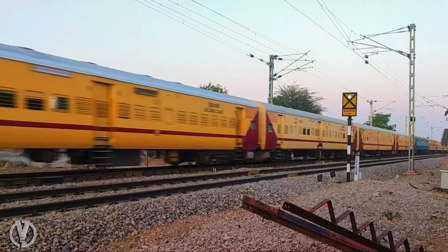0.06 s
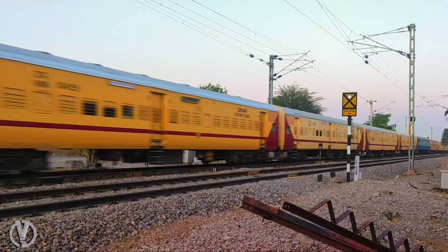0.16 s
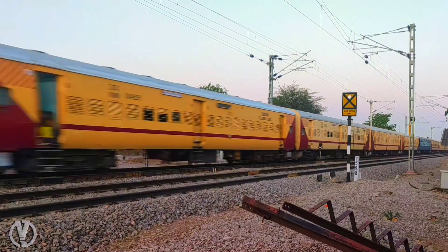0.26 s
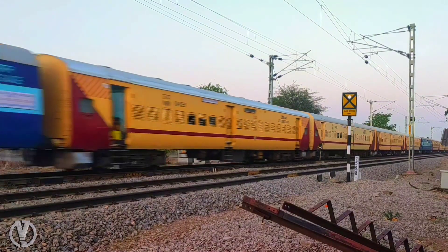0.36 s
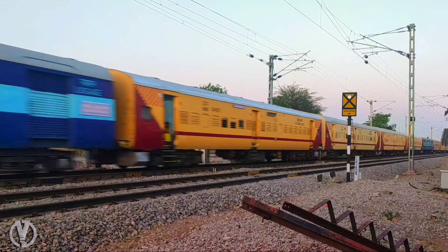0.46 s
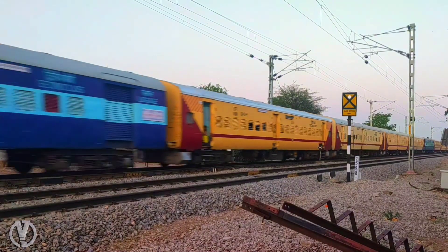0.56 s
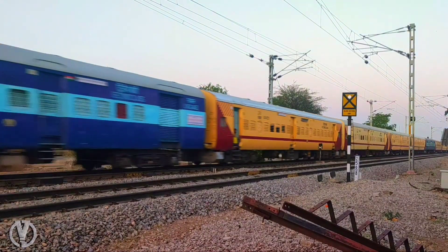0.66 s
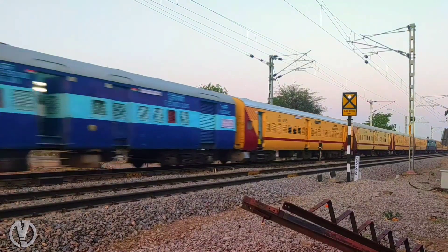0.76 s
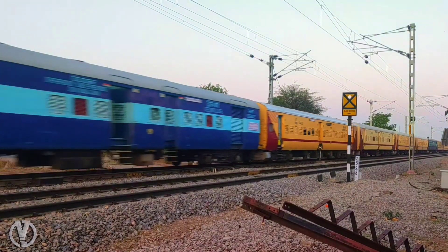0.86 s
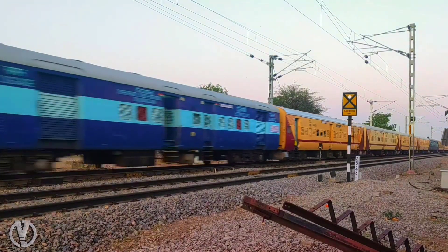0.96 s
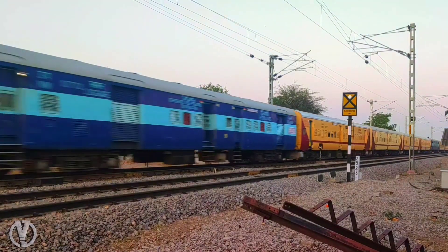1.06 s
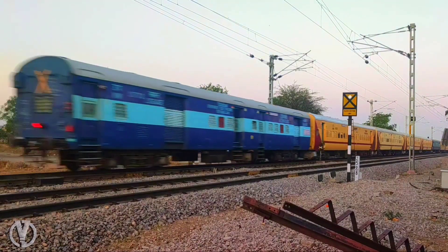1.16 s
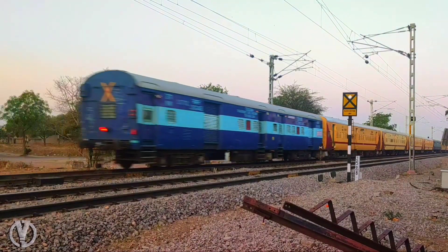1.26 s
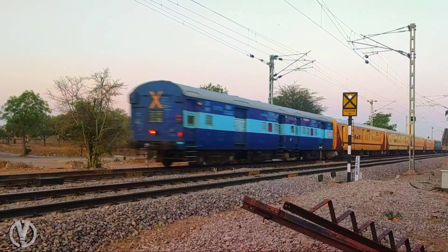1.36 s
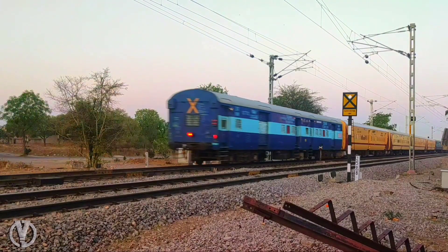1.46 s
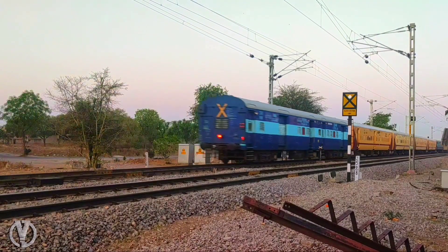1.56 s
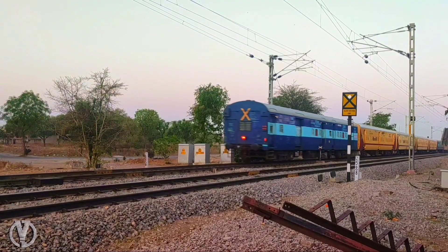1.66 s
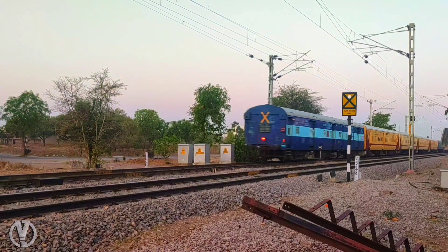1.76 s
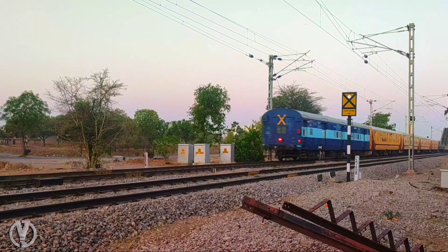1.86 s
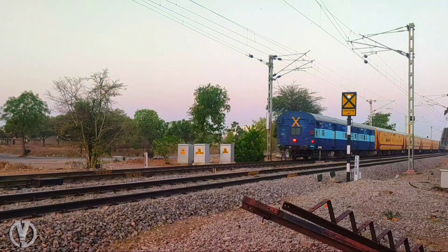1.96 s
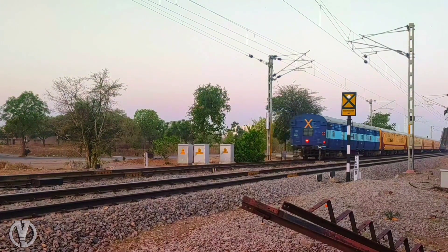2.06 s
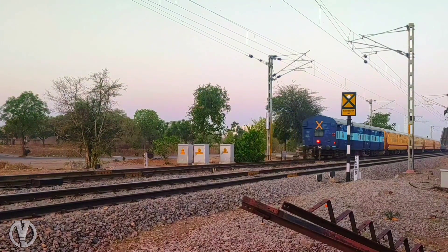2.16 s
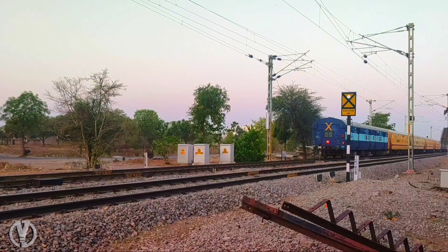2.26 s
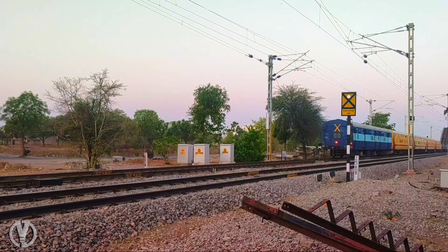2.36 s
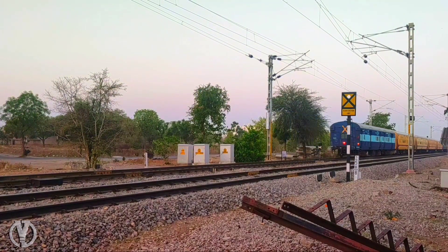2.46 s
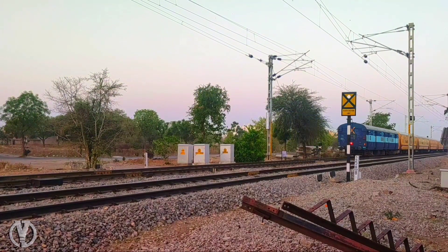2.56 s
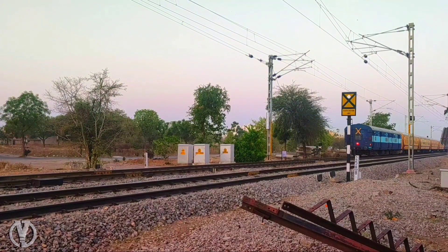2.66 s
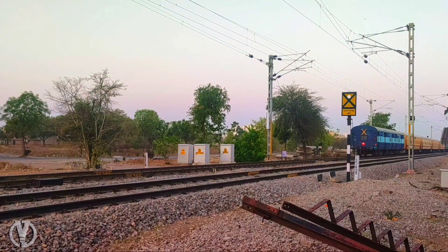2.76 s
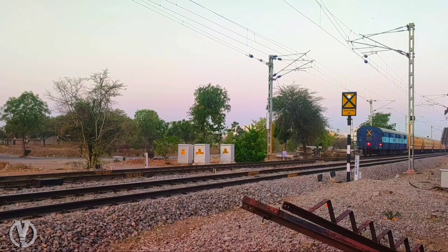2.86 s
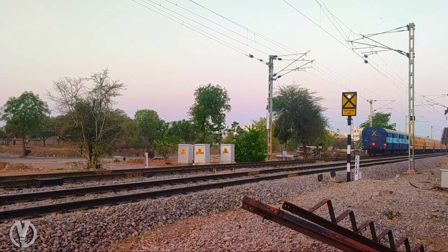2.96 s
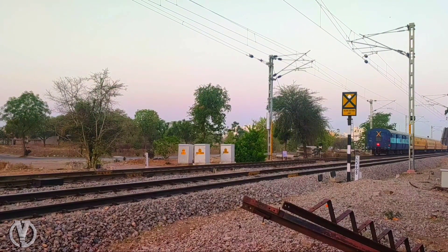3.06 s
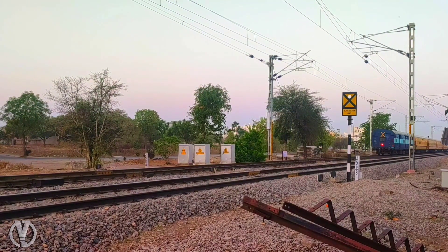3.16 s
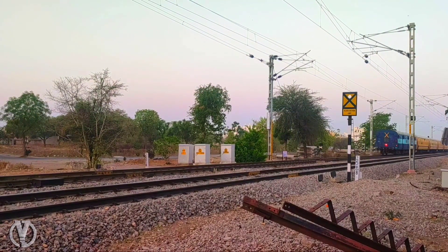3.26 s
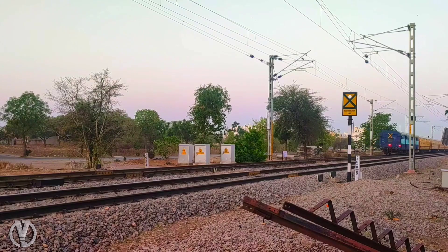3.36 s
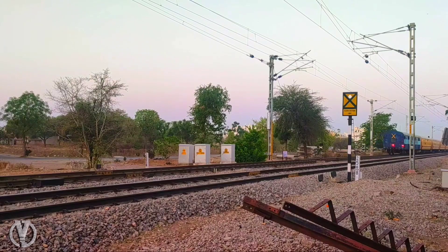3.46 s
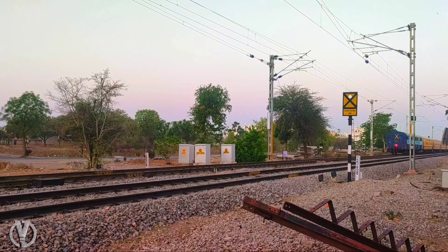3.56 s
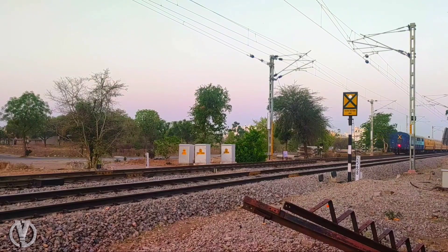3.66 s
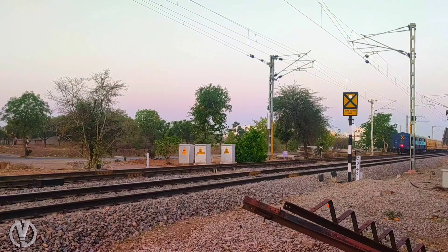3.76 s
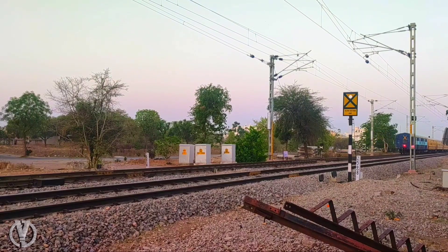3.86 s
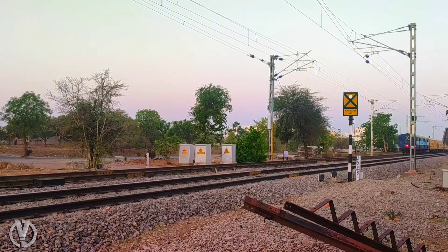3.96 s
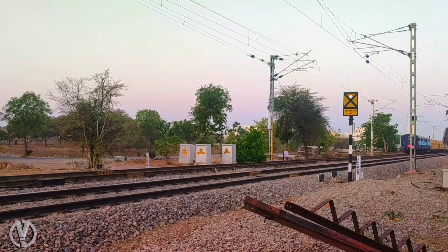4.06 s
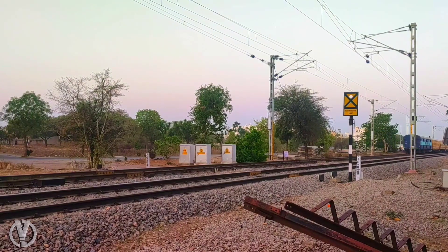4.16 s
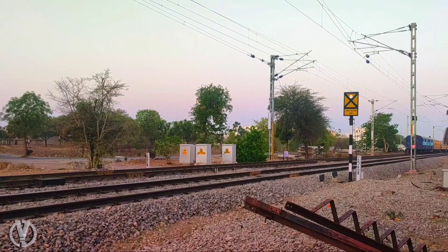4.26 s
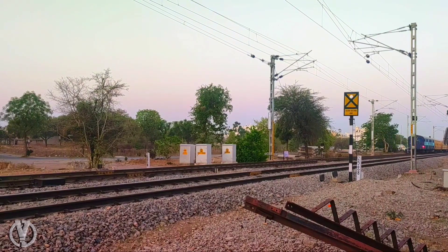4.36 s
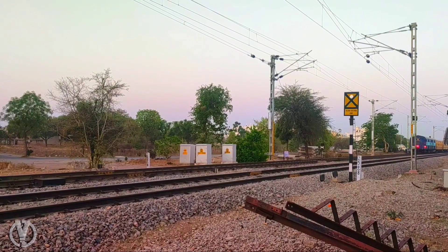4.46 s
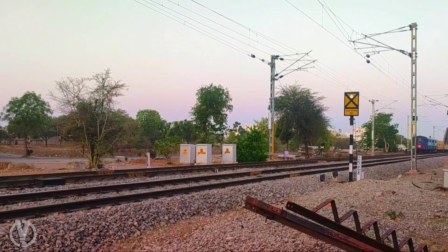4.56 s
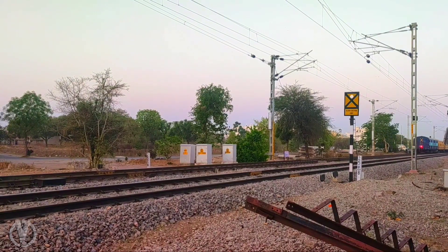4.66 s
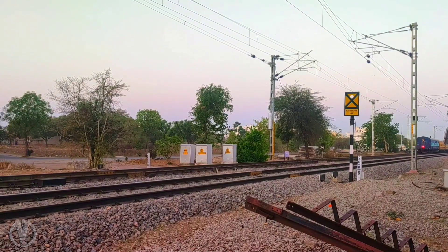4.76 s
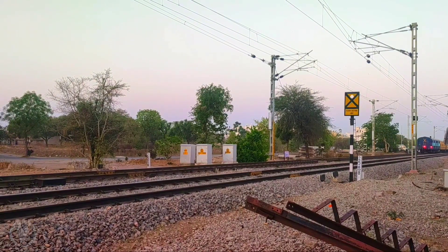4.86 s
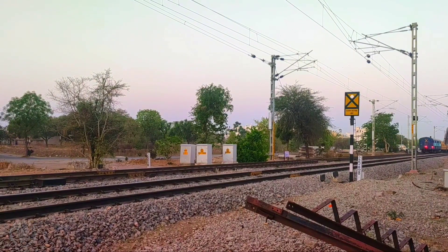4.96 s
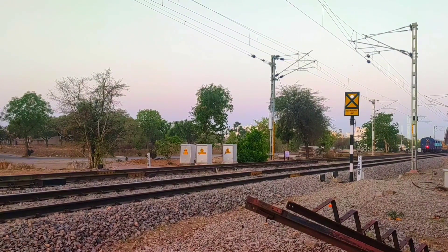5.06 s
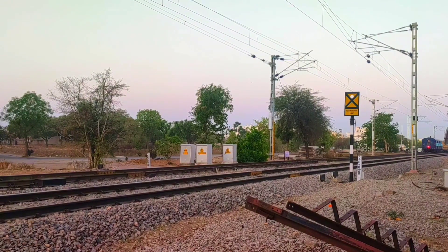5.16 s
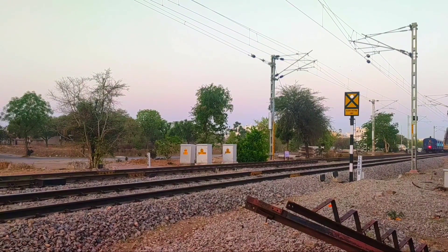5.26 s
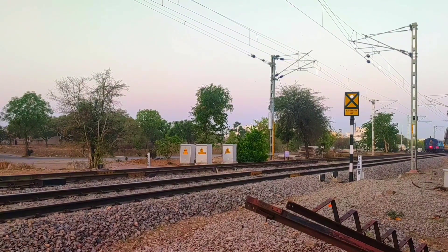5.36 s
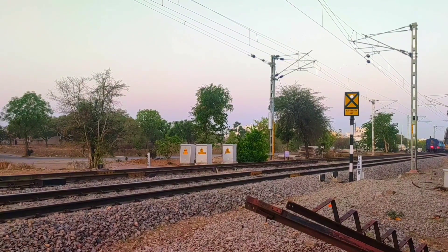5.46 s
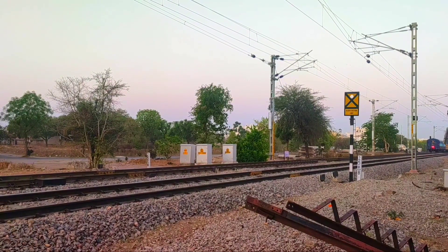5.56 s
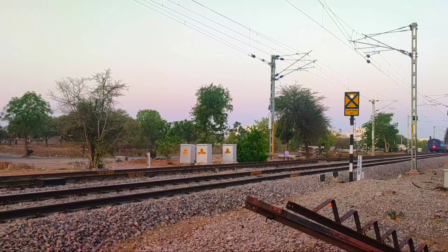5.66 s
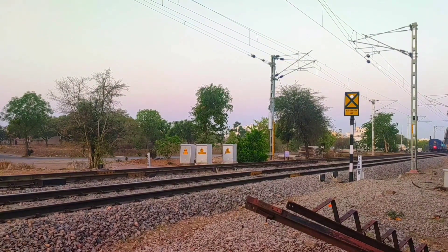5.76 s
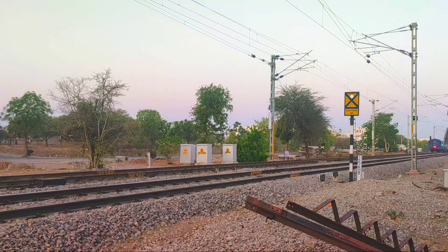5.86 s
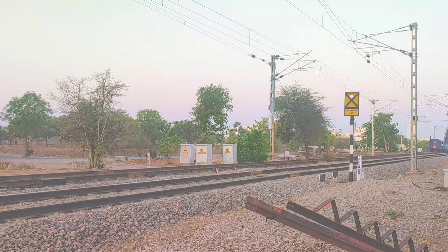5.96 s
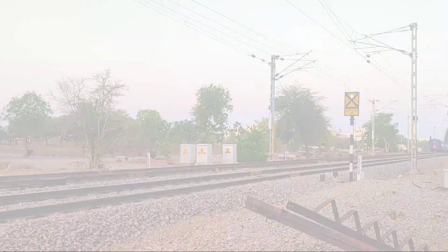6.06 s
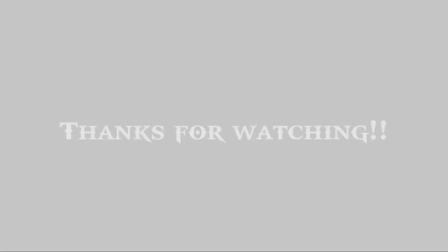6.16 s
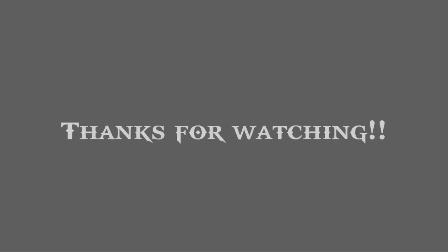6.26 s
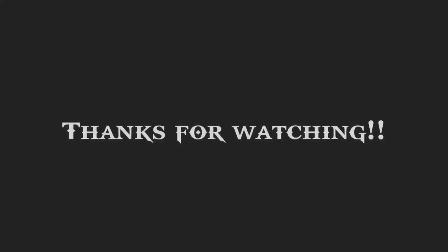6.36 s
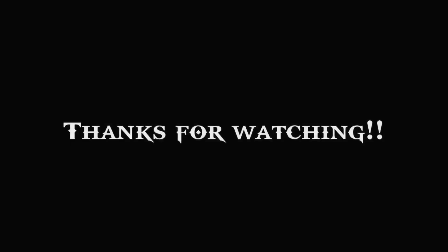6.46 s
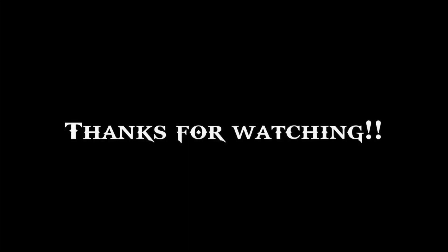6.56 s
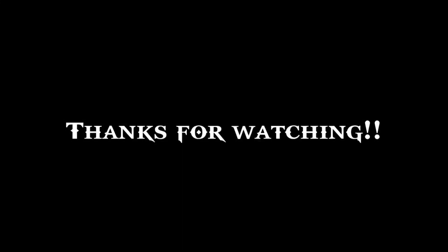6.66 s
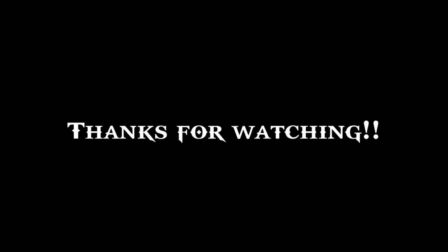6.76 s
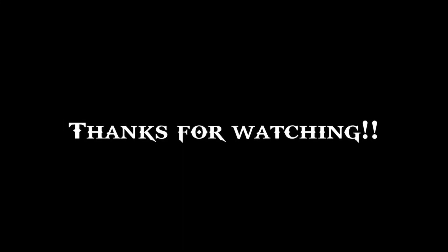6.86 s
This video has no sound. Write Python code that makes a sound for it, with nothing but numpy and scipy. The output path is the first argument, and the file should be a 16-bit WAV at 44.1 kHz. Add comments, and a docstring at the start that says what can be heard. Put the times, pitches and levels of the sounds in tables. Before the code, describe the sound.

Loud rushing train coaches with metallic clanks and brief wheel squeals pass a trackside listener, then shrink to distant rolling noise with faint bird chips.

```python
"""Beside a railway line, the last coaches of an express rush past and roll away into the distance.
Rough wheels shake noise and resonances out of wheel and rail; axles strike rail joints as shaped noise bursts
and ring the bogies; loose metal pings as short decaying sines, and a flange squeals in wavering tones.
Low filtered noise gives the rumble of ground and slipstream; a faint steady high hiss lies underneath;
a bird chips faintly in short rising tones, until the sound is faded out."""
import sys
import numpy as np
from scipy import signal
from scipy.fft import rfft, irfft, next_fast_len
from scipy.io import wavfile
from scipy.ndimage import uniform_filter1d

SR = 44100
rng = np.random.default_rng(int(sys.argv[2]) if len(sys.argv) > 2 else 0)


def store_wav(level_fs):
    """Save 16-bit WAV to argv[1]."""
    pcm = np.round(np.clip(np.atleast_2d(level_fs), -1, 1) * 32767)
    wavfile.write(sys.argv[1], SR, pcm.T.astype(np.int16))


def volts(x):
    """Linear amplitude factor 10**(x/20) for a level x in dB, scalar or array-like."""
    e = np.asarray(x, float) / 20
    return 10 ** e


N = 304277
SIZE = next_fast_len(N)
T = np.arange(N) / SR
HZ = np.maximum(np.arange(SIZE // 2 + 1) * SR / SIZE, 1)

# Spectral shape of rolling noise beside and ahead, before its bass roll-off: frequency_hz, density_db
NEAR_COLOUR = [(120, 5), (200, -10.5), (330, -2.5), (500, -3.5), (900, -2.5), (1350, -2.5), (1900, -2.5),
               (2250, -6), (2900, -11), (4200, -15), (6000, -20), (10000, -23), (13000, -32), (16000, -40)]
AWAY_COLOUR = [(130, -2), (200, -9), (300, -9.5), (420, -10.5), (660, -6.5), (868, -6.5), (1060, -7),
               (1300, -7), (1650, -2.5), (2140, -6.5), (2760, -14.5), (4160, -12), (5920, -16.5),
               (9840, -19), (11300, -23.5), (14000, -47.5)]
# Resonances of wheels and rails: frequency_hz, width_hz, nominal_rise_over_noise_db
NEAR_MODES = [(291.2, 56, 7.5), (640, 50, 8), (954, 60, 8.5), (2034, 73, 6), (2490, 74, 8.5),
              (3344, 310, 6), (3800, 89, 6.5)]
AWAY_MODES = [(672, 270, 3.96), (1026, 105, 9), (2110, 89, 6), (2370, 37, 3.8), (3473, 61, 5.9),
              (3754, 90, 5.7), (4160, 26, 7.4), (5100, 83, 1), (5680, 29, 1.3)]
# Shared part of the noise at two microphone ports: frequency_hz, share_0_to_1
NEAR_LIKE = [(100, 1), (400, 0.6), (1300, 0.87), (2400, 0.5), (4000, 0.07), (9000, 0)]
AWAY_LIKE = [(100, .98), (300, 0.97), (630, 0.8), (1400, 0.18), (3000, 0.44), (6700, 0.051)]
# Level difference of the ports, train beside and ahead: frequency_hz, left_minus_right_db
NEAR_BALANCE = [(60, 0.5), (500, 1), (1300, 2.5), (2300, 2.5), (4300, 1.5), (8000, 2), (13000, -1)]
AWAY_BALANCE = [(100, .5), (400, 0), (1050, -0.5), (1300, -5.5), (1650, -3), (2350, 4.5), (4340, -2.5),
                (8000, 5), (14000, -10)]
# Roar of the rolling train: time_s, level_db
ROLL = [(0, -12), (.2, -13), (.8, -11), (.97, -13.5), (1.15, -15.5), (1.4, -16), (1.7, -20.5), (2.1, -20.5),
        (2.3, -20), (2.7, -22), (3.1, -21), (3.5, -22), (4.9, -22.5), (5.3, -22.5), (5.9, -25.5)]
# Low mids of the rolling noise against its roar: time_s, relative_db
BOOM = [(0, 0), (.9, -4), (1.15, -4.5), (1.4, -4), (1.8, -8), (2.6, -10), (3.1, -15.5), (4.3, -12),
        (5.6, -4.5), (5.9, -7.5)]
# Spectral shape of the rumble, before its treble roll-off: frequency_hz, density_db
RUMBLE_COLOUR = [(8.8, -53), (15, 0), (54, 3), (84, -5), (114, -14.5), (200, -18), (260, -58), (440, -120)]
# Ground and slipstream: time_s, level_db
RUMBLE_LEVEL = [(0, -15.5), (.9, -16.5), (1.0, -21), (2.2, -20.5), (2.46, -16), (2.8, -22.5), (3.3, -18.5),
                (5.6, -18.5), (6.1, -22)]
# Rail joints: last_axle_s, clank_db, thump_db, hiss_db, smear_ratio (how much longer than a near blow)
JOINTS = [(.819, -11, -23, -20.5, 1.05), (1.433, -20, -12, -24.5, 1.2), (2.468, -18, -27, -22.5, 1.6)]
# Extra force of each axle of the last two coaches, front to back: blow_db
AXLE_DB = [-0.5, -0.5, -3, -1.5, -2, 0.7, 1, 1.8]
# Knocks outside the axle rhythm: time_s, clank_db, thump_db, hiss_db
KNOCKS = [(0.358, -11, -25, -21.5), (1.227, -12, -14.5, -40.5), (2.177, -25.5, -43, -30.5),
          (2.295, -41, -40, -28.5), (2.413, -20.5, -28.5, -25.5)]
# Resonances of a struck bogie frame: frequency_hz, relative_db, t60_s
BOGIE_MODES = [(283, 4.5, .12), (396, 1.5, 0.1), (547, -3.5, 0.042)]
# Brief tones, mostly a singing wheel or flange: centre_s, pitch_hz, level_db, spread_s
SQUEALS = [(.02, 1980, -12.5, 0.019), (.115, 7200, -15, 0.045), (.30, 1870, -17.5, 0.02),
           (.40, 910, -19, 0.052), (.715, 2470, -15.5, 0.03), (.72, 1750, -16.5, 0.03),
           (.97, 928, -19.5, 0.097), (.93, 2500, -23.5, .03), (1.14, 2443, -17.5, 0.047),
           (1.28, 2530, -19.5, 0.049), (1.38, 8200, -29, 0.043), (1.41, 6300, -24, .013),
           (1.44, 4650, -24.5, 0.062), (1.91, 7250, -27, .012), (2.28, 1040, -23, 0.05),
           (3.14, 4200, -32, .07), (3.15, 1052, -27.5, 0.14), (5.25, 195, -29, .08), (5.37, 3810, -37, .07)]
# Clearer bird chips: time_s, top_hz, level_db
CHIPS = [(4.66, 5900, -36), (4.81, 4950, -39), (4.843, 5530, -31.5), (5.425, 6970, -34), (5.682, 4700, -35),
         (5.697, 5000, -33), (5.703, 5900, -33), (5.99, 5930, -41)]

PORT_LAG = 22  # samples that sound from the side needs between the ports
SPEED_M_S, TAIL_PASSES_S, TRACK_M = 22.2, 1.7, 11.8
HISS_START_DB, HISS_BESIDE_DB, HISS_SETTLES_S = 0, -8, 0.33  # treble against the roar, coaches alongside
HISS_DB_PER_DOUBLING = -5  # treble change each time the distance to the tail doubles
HISS_DROPS_S, HISS_DROP_DB = 2.55, -2  # treble sinks further once the last axle has left the far joint
# gaps between axles of a bogie, bogies of a coach, bogies across a coupling
AXLE_GAP_S, BOGIE_GAP_S, COUPLING_GAP_S = 0.102, 0.529, 0.267
KNOCK_SMEAR = 1.5
BACKGROUND_DB, BACKGROUND_HZ = -59, 9000  # level of the background hiss, and where it sets in
CHIP_RISE = 0.035  # share of the pitch that a chip climbs
FAINT_START_S, FAINT_END_S = 4.3, 6.1  # random fainter chips
FAINT_LOW_HZ, FAINT_HIGH_HZ, FAINT_DB = 4730, 6400, -43
FADE_START_S, FADE_END_S = 5.84, 6.22


def curves(table):
    """Linear interpolation: the columns of a table become curves over time."""
    s, *columns = np.transpose(table)
    return [np.interp(T, s, c) for c in columns]


def over_hz(points, hz=HZ):
    """Logarithmic frequency scale: points are joined by straight lines on it."""
    f, v = np.transpose(points)
    return np.interp(np.log(hz), np.log(f), v, left=v[0], right=v[-1])


def unit(x):
    """Normalisation of power: scale to rms 1."""
    return x / np.sqrt(np.mean(x ** 2))


def walk(rate, step=64):
    """Random modulation: levels held about 1 / rate s, smoothed twice, with rms 1."""
    k = max(int(SR / step / rate), 2)
    held = np.repeat(rng.standard_normal(N // step // 2 + 2), k)[:N // step + 1]
    smooth = uniform_filter1d(uniform_filter1d(held, k), k)
    return np.interp(np.arange(N), np.arange(len(smooth)) * step, unit(smooth))


def bump(s, rise_s, fall_s):
    """Gaussian envelope with separate spreads for rise and fall."""
    return np.exp(-0.5 * ((T - s) / np.where(T < s, rise_s, fall_s)) ** 2)


def side_lag(side):
    """Path difference: side treble reaches the left port late; bass from the whole train lags less."""
    lag = side * PORT_LAG * HZ ** 2 / (HZ ** 2 + 505.0 ** 2)
    return np.exp(-2j * np.pi * HZ * lag / SR)


def pair(like, side):
    """Partial coherence: noise spectra at two ports mix shared and private parts; side 0 is ahead."""
    shared, a, b = rfft(rng.standard_normal((3, SIZE)))
    c = np.clip(over_hz(like), 0, 1)
    tilt = volts(over_hz(NEAR_BALANCE if side else AWAY_BALANCE) / 2)
    left = np.sqrt(c) * shared * side_lag(side) + np.sqrt(1 - c) * a
    right = np.sqrt(c) * shared + np.sqrt(1 - c) * b
    return np.array([left * tilt, right / tilt])


def thirds(noise, gain):
    """Band splitting: low, middle and high parts of one noise, with soft edges."""
    low = 1 / (1 + (HZ / 650) ** 4)
    high = 1 / (1 + (4480.0 / HZ) ** 4)
    return [irfft(noise * gain * g, SIZE)[:, :N] for g in (low, 1 - low - high, high)]


def roll_levels():
    """Loss with distance: levels of roar, boom and hiss in dB, the hiss dulling as the tail recedes."""
    metres = np.hypot(SPEED_M_S * np.maximum(T - TAIL_PASSES_S, 0), TRACK_M)
    hiss_db = HISS_BESIDE_DB + (HISS_START_DB - HISS_BESIDE_DB) * np.exp(-T / HISS_SETTLES_S)
    hiss_db = hiss_db + HISS_DB_PER_DOUBLING * np.log2(metres / TRACK_M)
    hiss_db = hiss_db + HISS_DROP_DB * np.clip((T - HISS_DROPS_S) / 0.15, 0, 1)
    return curves(ROLL)[0], curves(BOOM)[0], hiss_db


def rolling(colour, modes, like, side, flicker_db, ring_db, ring_rate):
    """Roughness excitation: treads shake wheel and rail into broad noise and fluctuating resonances."""
    level_db, boom_db, hiss_db = roll_levels()
    noise = pair(like, side)
    gain = volts(over_hz(colour)) * HZ ** 2 / (HZ ** 2 + 121.0 ** 2)
    parts = thirds(noise, gain)
    scale = np.sqrt(np.mean(parts[1] ** 2))
    # the boom pounds most unevenly
    parts = [unit(p) * volts(k * flicker_db * walk(14.0)) for p, k in zip(parts, (2.2, 1.2, 0.9))]
    for hz, width, db in modes:
        resonance = 1j * HZ * width / (hz ** 2 - HZ ** 2 + 1j * HZ * width)
        ring = irfft(noise * gain * resonance, SIZE)[:, :N]
        part = 0 if hz < 500 else 1
        parts[part] = parts[part] + ring / scale * (volts(db) - 1) * volts(ring_db * walk(ring_rate))
    boom, roar, hiss = [unit(p) for p in parts]
    return volts(level_db) * (volts(boom_db) * boom + roar + volts(hiss_db) * hiss)


def rumble():
    """Low-frequency coherence: ground shake and slipstream, nearly alike at both ports, in uneven lumps."""
    gain = volts(over_hz(RUMBLE_COLOUR)) / (1 + (HZ / 290.0) ** 4)
    low = irfft(pair(AWAY_LIKE, 0) * gain, SIZE)[:, :N]
    lumps_db = 0.8 * walk(11.0) + 1.5 * walk(25.0)
    return unit(low * volts(lumps_db)) * volts(curves(RUMBLE_LEVEL)[0])


def background_hiss():
    """High-pass noise: a faint steady background hiss."""
    spectrum = rfft(rng.standard_normal((2, SIZE))) / (1 + (BACKGROUND_HZ / HZ) ** 4)
    hiss = irfft(spectrum, SIZE)[:, :N]
    return volts(BACKGROUND_DB + 1.5 * walk(12.0)) * unit(hiss)


def pings(count=420):
    """Damped vibration: loose metal along the train gives short rings that thin out over three seconds."""
    out = np.zeros((2, N))
    level_db, _, hiss_db = roll_levels()
    for when, height, length, force, pan in rng.random((count, 5)):
        i = int(3 * when ** 1.4 * SR)
        hz = 700 * 14 ** height
        age = T[:int((0.012 + 0.035 * length) * SR)]
        ring = np.minimum(age / 0.004, 1) * (1 - age / age[-1]) * np.sin(2 * np.pi * hz * age)
        db = level_db[i] + height * (hiss_db[i] - 4) - 6 + 7 * force
        out[:, i:i + len(age)] += volts(db) * ring * np.sqrt([[pan], [1 - pan]])
    return out


def blows():
    """Periodic impact: axle spacing times the blows at each joint; stray knocks join them, as columns."""
    coach = np.array([0, AXLE_GAP_S, BOGIE_GAP_S, BOGIE_GAP_S + AXLE_GAP_S])
    axle_s = np.concatenate([coach - BOGIE_GAP_S - COUPLING_GAP_S, coach]) - coach[-1]
    rows = []
    for s, *db, smear in JOINTS:
        for offset_s, force_db in zip(axle_s, AXLE_DB):
            if s + offset_s > 0:
                rows.append((s + offset_s, *(np.array(db) + force_db), smear))
    return np.transpose(rows + [(*k, KNOCK_SMEAR) for k in KNOCKS])


def bogie(s, thump_db):
    """Impulse response: each blow sets bogie-frame resonances ringing with exponential decay."""
    out = np.zeros(N)
    detune = 1 + 0.06 * rng.standard_normal((len(s), len(BOGIE_MODES)))
    age = T[:SR // 4]
    for t0, blow_db, ratios in zip(s, thump_db, detune):
        i = max(int((t0 - 0.008) * SR), 0)
        for (hz, db, t60), k in zip(BOGIE_MODES, ratios):
            env = (1 - np.exp(-age / 0.0029)) * 1000.0 ** (-age / t60)
            out[i:i + len(age)] += volts(blow_db + db) * env * np.sin(2 * np.pi * hz * k * age)
    return np.array([np.roll(out, PORT_LAG // 3), out])


def joints(gone):
    """Broadband impact: axles drop into rail gaps with soft-edged bursts of thump, clank and hiss."""
    s, clank_db, thump_db, hiss_db, smear = blows()
    gain = volts(over_hz(NEAR_COLOUR)) * HZ ** 2 / (HZ ** 2 + 150 ** 2)
    beside = thirds(pair(NEAR_LIKE, 0.85), gain)
    ahead = thirds(pair(AWAY_LIKE, 0), gain)
    levels, rises_s, falls_s = (thump_db, clank_db, hiss_db), (0.007, 0.007, 0.012), (0.022, 0.018, 0.024)
    out = 0
    for a, b, db, rise_s, fall_s in zip(beside, ahead, levels, rises_s, falls_s):
        env = sum(volts(g) * bump(t0, k * rise_s, np.sqrt(k) * fall_s) for t0, g, k in zip(s, db, smear))
        out = out + env * (unit(a) * np.cos(gone) + unit(b) * np.sin(gone))
    return out + bogie(s, thump_db)


def squeals():
    """Frequency modulation: brief tones waver in pitch, and in phase and level apart at each port."""
    out = 0
    waver = np.array([[walk(70.0), walk(70.0)] for _ in range(3)])
    for k, (s, hz, db, half_s) in enumerate(SQUEALS):
        # each tone reads the wavers from another point
        pitch_waver, phase_waver, level_waver = np.roll(waver, k * 9001, axis=2)
        pitch = hz + min(22.0, 0.02 * hz) * pitch_waver[0]
        left_lag = 2 * np.pi * hz * PORT_LAG / SR * (s < 1.5)  # only early tones come from the side
        phase = 2 * np.pi * np.cumsum(pitch) / SR - np.array([[left_lag], [0]])
        phase = phase + 0.5 * phase_waver
        out = out + volts(db + 2.5 * level_waver) * bump(s, half_s, half_s) * np.sin(phase)
    return out


def bird(count=14):
    """Frequency glide: faint, broken rising chips, stronger and earlier at the left port."""
    out, waver_hz = 0, 220.0 * walk(150.0)
    faint = []
    for u, v, w in rng.random((count, 3)):
        s = FAINT_START_S + u * (FAINT_END_S - FAINT_START_S)
        top_hz = FAINT_LOW_HZ + v * (FAINT_HIGH_HZ - FAINT_LOW_HZ)
        faint.append((s, top_hz, FAINT_DB + 4.0 * w))
    for s, top_hz, db in [*CHIPS, *faint]:
        pitch = top_hz * np.interp(T, [s - 0.012, s + 0.006], [1 - CHIP_RISE, 1]) + waver_hz
        out = out + volts(db) * bump(s, 0.007, 0.006) * np.sin(2 * np.pi * np.cumsum(pitch) / SR)
    out = out * volts(4.2 * walk(200.0))
    return np.array([out, 0.5 * np.roll(out, 9)])


def scene():
    """Superposition: the train beside and ahead, its blows and rings, rumble, background hiss and bird."""
    # the tail of the train swings from the side to straight ahead, as an angle
    gone = np.pi / 2 * np.clip((T - 1.4) / 0.27, 0, 1)
    near = rolling(NEAR_COLOUR, NEAR_MODES, NEAR_LIKE, side=1, flicker_db=1.2, ring_db=4, ring_rate=12)
    away = rolling(AWAY_COLOUR, AWAY_MODES, AWAY_LIKE, side=0, flicker_db=0.6, ring_db=3, ring_rate=6)
    train = near * np.cos(gone) + away * np.sin(gone)
    return train + rumble() + background_hiss() + pings() + joints(gone) + squeals() + bird()


def top_cut(x):
    """Nothing passes above the cut-off."""
    return signal.sosfilt(signal.butter(12, 15350, fs=SR, output="sos"), x)


def record(dry):
    """Saturation and band limiting: peaks clip softly, the top is cut, and the end fades to silence."""
    loud = dry / (1 + np.abs(dry) ** 6) ** (1 / 6)
    loud = signal.sosfilt(signal.ellip(8, 0.2, 60, 15300, fs=SR, output="sos"), loud)
    fade = np.clip((FADE_END_S - T) / (FADE_END_S - FADE_START_S), 0, 1)
    return top_cut(loud * fade)


dry = scene()
out = record(dry)
store_wav(out)
```